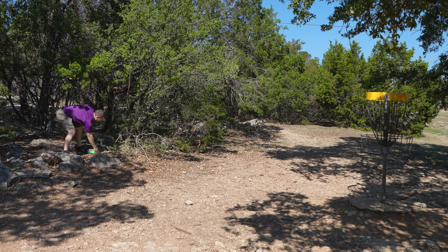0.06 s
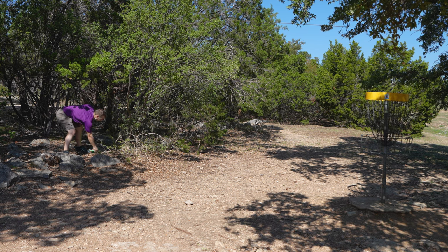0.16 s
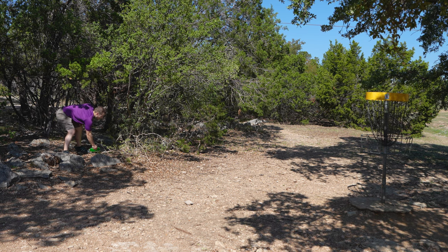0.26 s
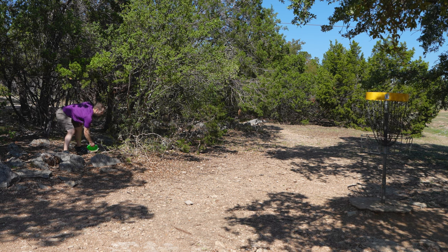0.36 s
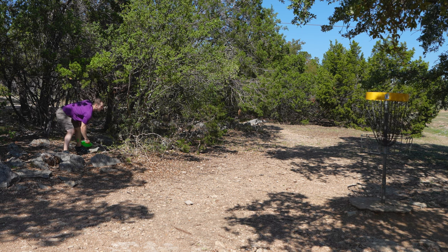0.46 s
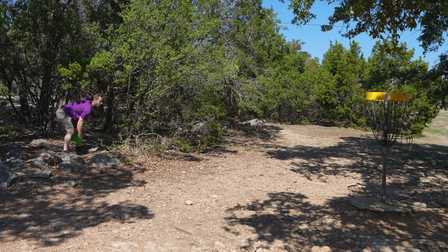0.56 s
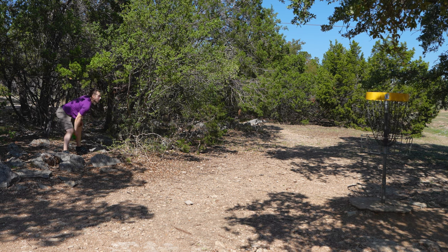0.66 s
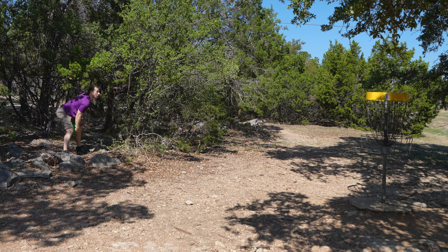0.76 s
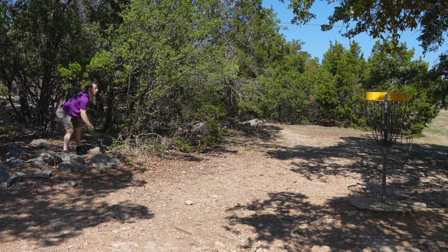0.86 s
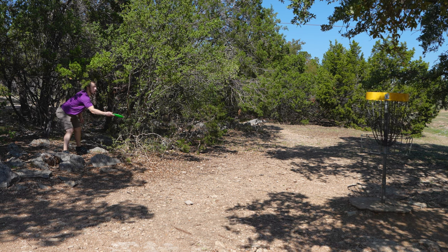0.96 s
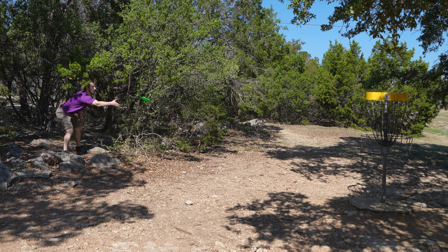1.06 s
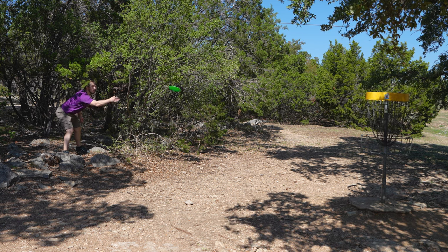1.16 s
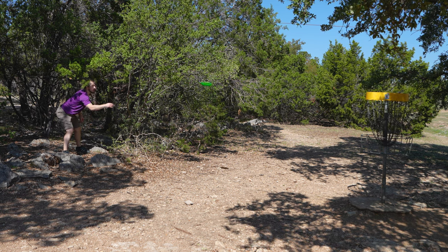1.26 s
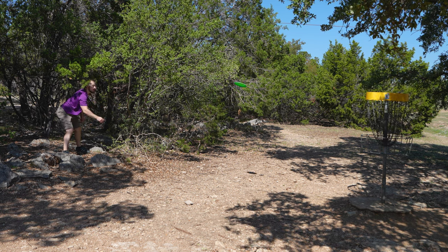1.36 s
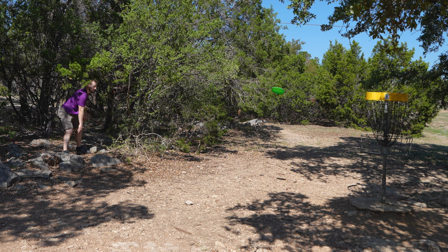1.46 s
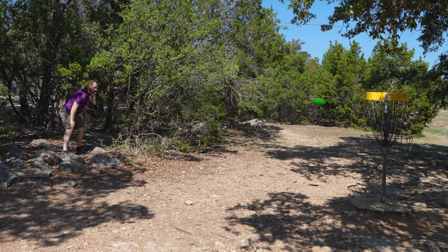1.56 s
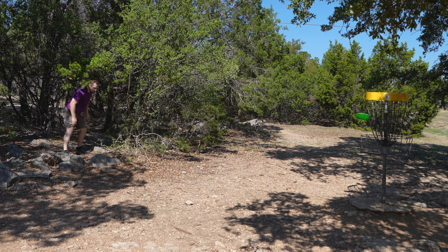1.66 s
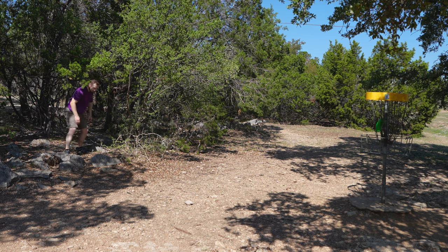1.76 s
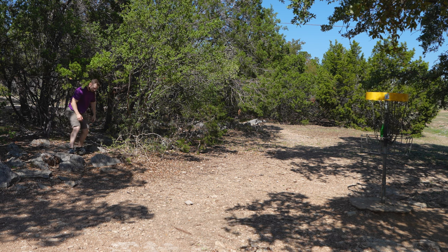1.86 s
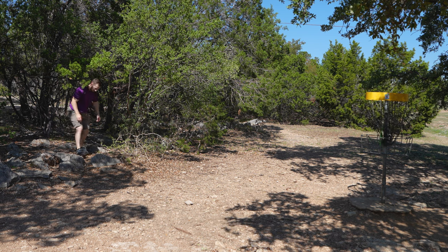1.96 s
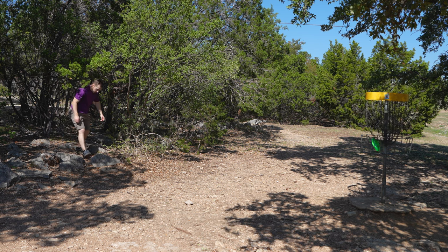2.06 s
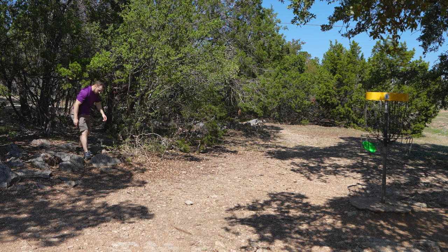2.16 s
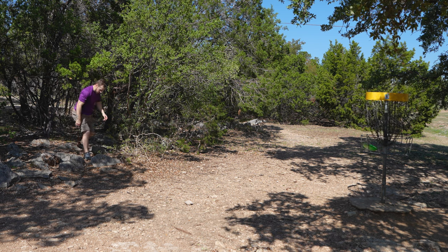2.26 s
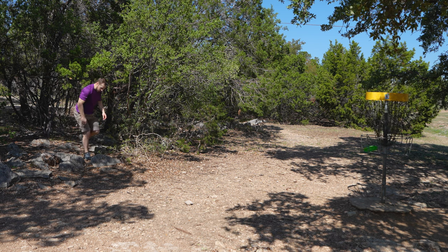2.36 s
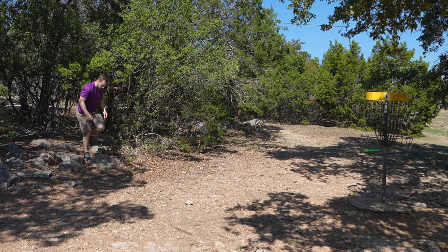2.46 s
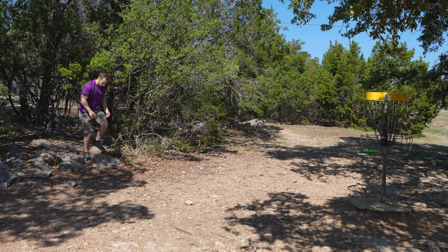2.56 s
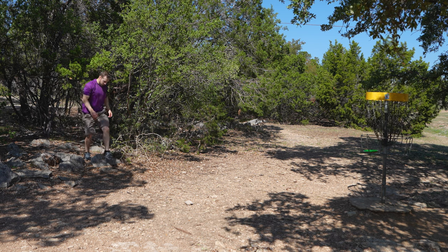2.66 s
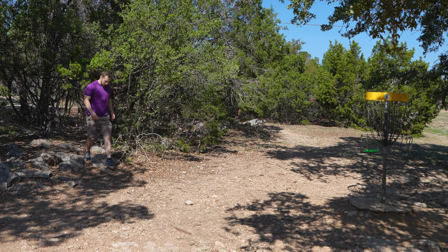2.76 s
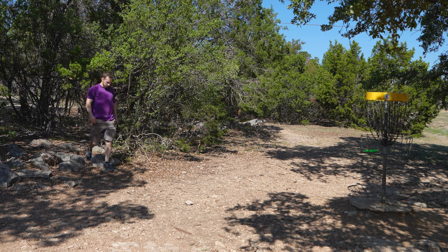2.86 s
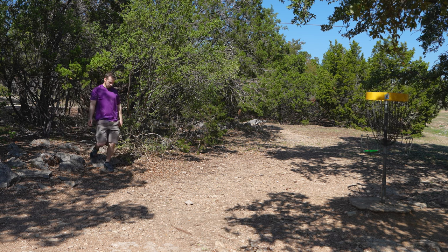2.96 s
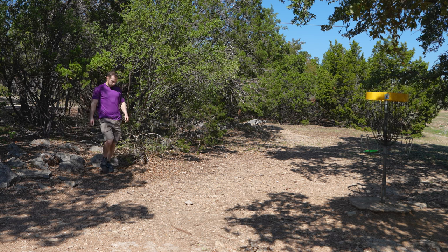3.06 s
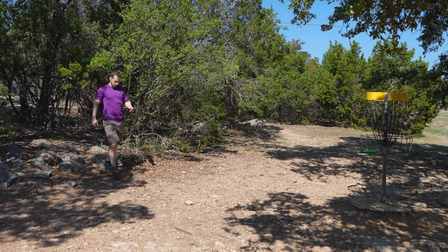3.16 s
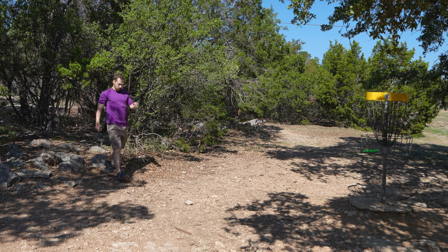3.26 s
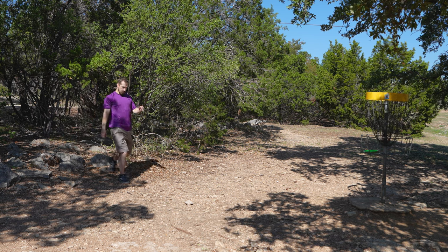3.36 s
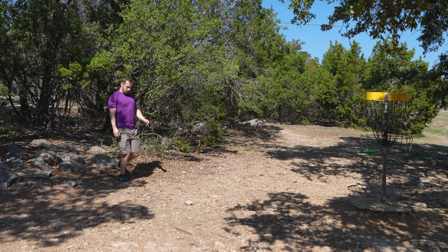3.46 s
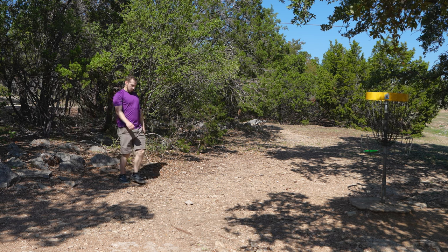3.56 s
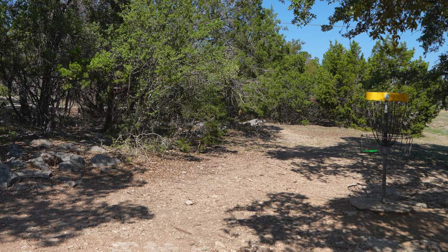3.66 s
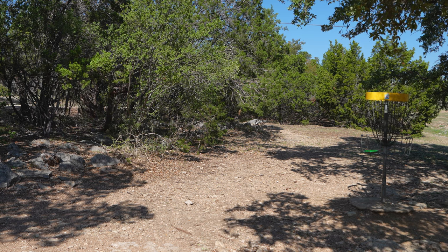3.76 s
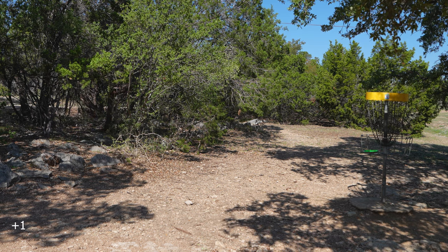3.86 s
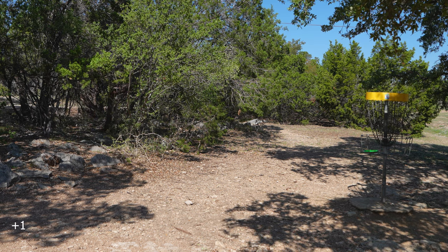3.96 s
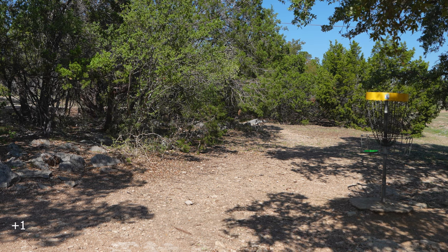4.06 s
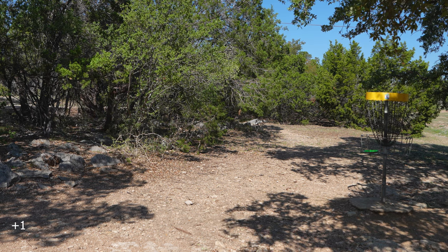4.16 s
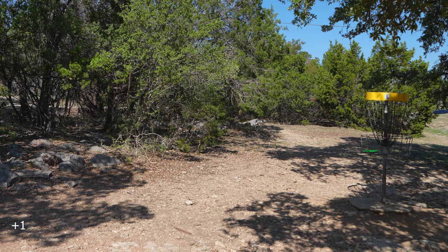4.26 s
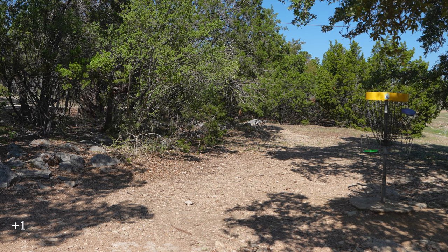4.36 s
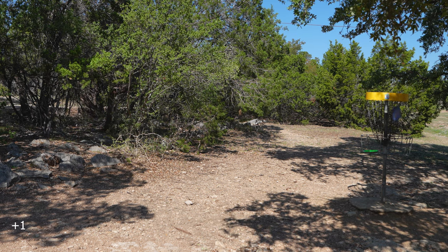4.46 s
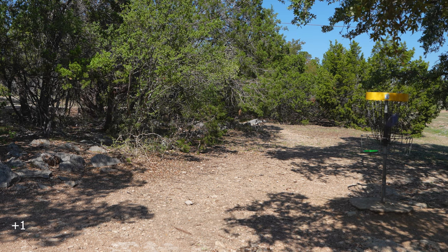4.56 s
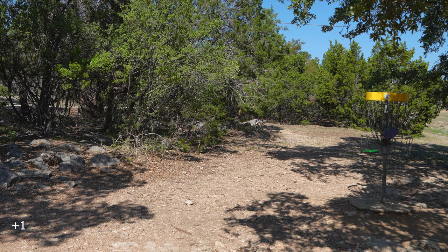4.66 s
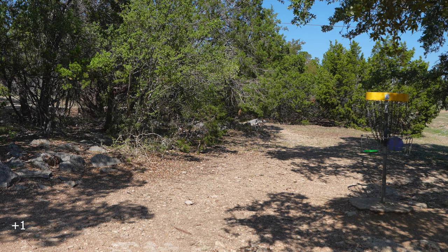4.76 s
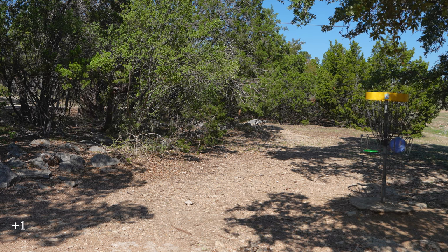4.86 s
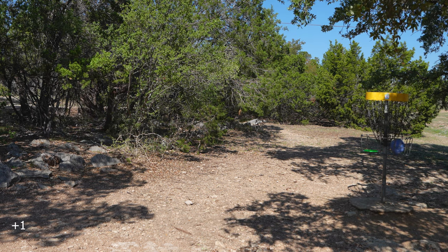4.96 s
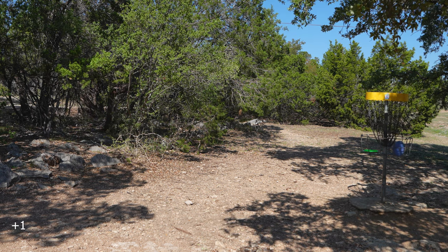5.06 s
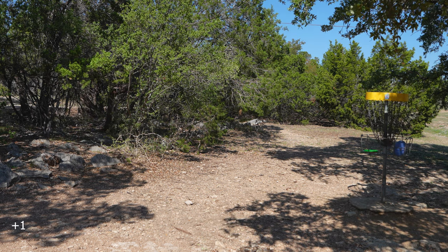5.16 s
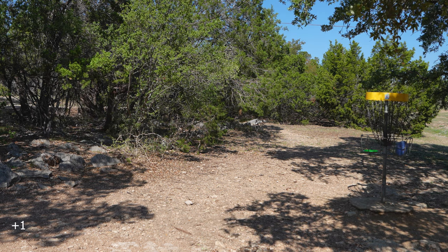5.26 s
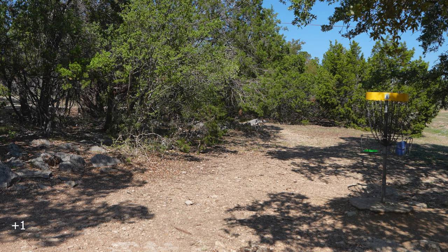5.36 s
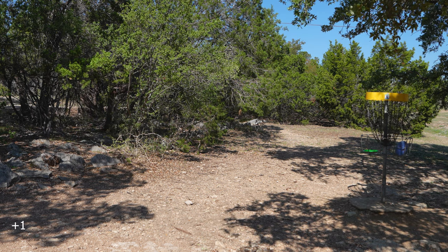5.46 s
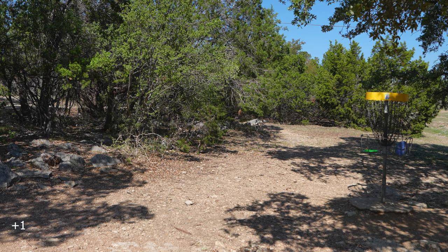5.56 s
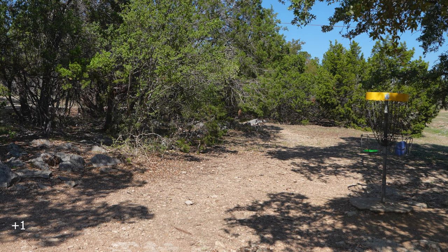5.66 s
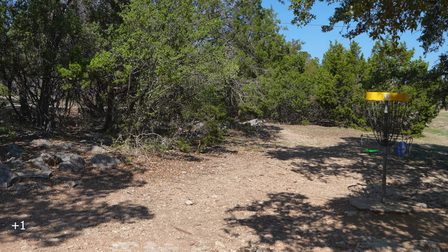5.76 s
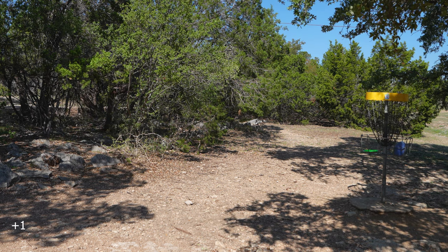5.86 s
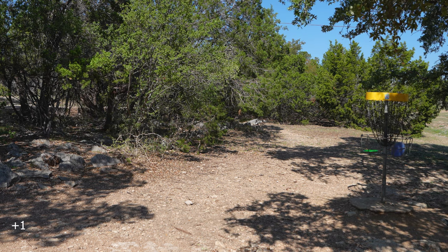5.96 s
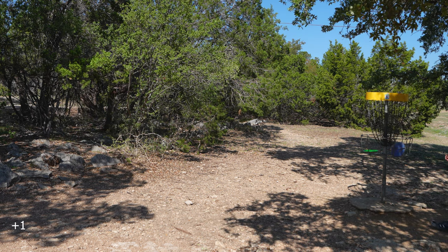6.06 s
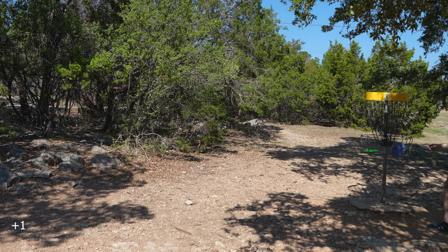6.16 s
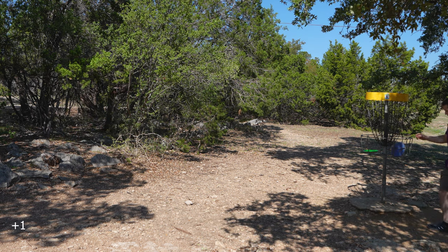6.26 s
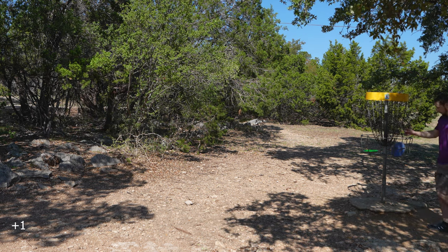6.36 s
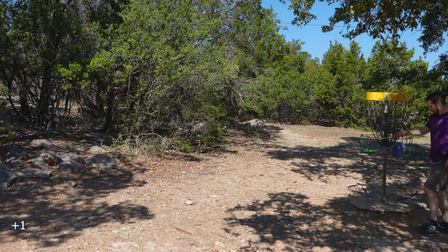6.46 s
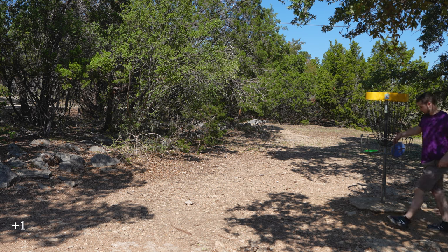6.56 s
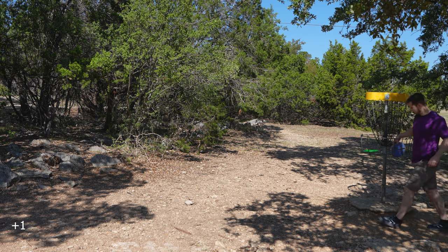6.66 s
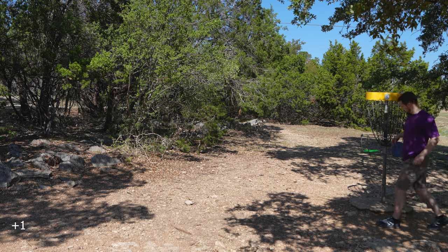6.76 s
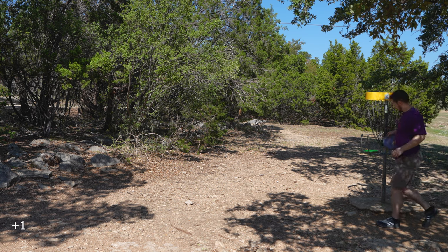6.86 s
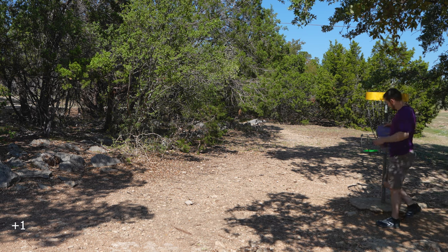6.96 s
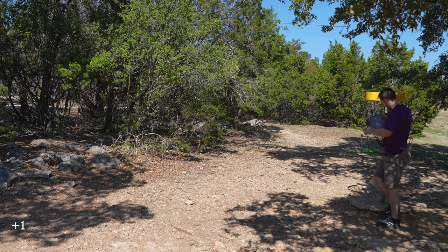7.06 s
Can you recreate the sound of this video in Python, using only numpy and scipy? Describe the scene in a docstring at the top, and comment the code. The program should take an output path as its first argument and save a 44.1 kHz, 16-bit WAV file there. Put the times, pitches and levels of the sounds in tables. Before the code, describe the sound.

Wind thumps the microphone, then a plastic disc crashes into steel chains on the right, jingling and fading; a second disc strikes harder soon after.

```python
"""A clearing among trees: two plastic discs strike the steel chains of a basket to the right, one after the other.
Links and hoop ring as sums of decaying modes, contacts rattle as shaped noise, and noise blows excite the discs.
The thrower's steps on gravel are bursts of tiny cracks; a faint bird and an insect are a gliding tone and a narrow band.
Gusts buffet the microphone as puffs of low noise around the first throw; a steadier low noise lies under the second."""
import sys
import numpy as np
from scipy import signal
from scipy.fft import rfft, irfft, next_fast_len
from scipy.io import wavfile
from scipy.ndimage import uniform_filter1d, map_coordinates

SR = 44100
rng = np.random.default_rng(int(sys.argv[2]) if len(sys.argv) > 2 else 0)


def digitize_waveform(pressure):
    """Quantize a signal to 16-bit integers and store it at the path in sys.argv[1].

    Rows of a 2-D input are taken as channels; values are limited to [-1, 1].
    """
    field = np.atleast_2d(pressure).T
    bounded = np.clip(field, -1, 1)
    quanta = np.round(bounded * 32767).astype(np.int16)
    wavfile.write(sys.argv[1], SR, quanta)


N = 313992

# spectrum of rattling chain contacts: f/Hz, relative density/dB
RATTLE_SPECTRUM = [(500, -36.5), (1200, -3), (2300, -1), (3300, -6), (5000, 1), (8000, 2), (10500, 5.5),
                   (14000, 2), (16000, 3.5)]


def amp(db):
    """Amplitude ratio of a level: 20 dB to a factor of ten."""
    return 10 ** (np.asarray(db) / 20)


def unit(x):
    """Normalisation to an rms of 1."""
    return x / np.sqrt(np.mean(x ** 2) + 1e-20)


def along(points, hz):
    """Interpolation of (f/Hz, value) points on a logarithmic frequency axis."""
    f, v = np.transpose(points)
    return np.interp(np.log(hz + 1), np.log(f + 1), v)


def levels(rows):
    """Level contours: one gain per sample for each dB column, -120 dB outside the rows."""
    s, *columns = np.transpose(rows)
    t = np.arange(N) / SR
    return [amp(np.interp(t, s, column, left=-120, right=-120)) for column in columns]


def wobble(rate):
    """Slow random modulation: a smooth curve through `rate` random knots a second."""
    knots = rng.standard_normal(int(N * rate / SR) + 4)
    return map_coordinates(knots, [np.arange(N) * rate / SR])


def filtered(x, response):
    """Linear filtering: the spectrum of x times a complex response of frequency."""
    size = x.shape[-1]
    m = next_fast_len(size + SR // 4)
    spectrum = rfft(x, m) * response(np.fft.rfftfreq(m, 1 / SR))
    return irfft(spectrum, m)[..., :size]


def coloured(x, spectrum):
    """Spectral shaping of x, at rms 1."""
    return unit(filtered(x, lambda hz: amp(along(spectrum, hz))))


def steady(x, seconds):
    """Level control: divides x by its running rms, keeping the quicker flicker."""
    size = max(int(seconds * SR), 8)
    power = uniform_filter1d(uniform_filter1d(x ** 2, size), size)
    return x / np.sqrt(np.abs(power) + 1e-4 * np.mean(x ** 2))


def add(track, s, sound):
    """Superposition: mixes a sound in at time s."""
    part = track[max(round(s * SR), 0):][:len(sound)]
    part += sound[:len(part)]


def spell(start, end, rise_s, fall_s):
    """Exponential relaxation: an envelope that rises at start, holds, and dies away after end."""
    t = np.arange(N) / SR
    rise = 1 - np.exp(-np.maximum(t - start, 0) / rise_s)
    return rise * np.exp(-np.maximum(t - end, 0) / fall_s)


def contacts(rate, scatter_db):
    """Random impacts: impulses at `rate` a second, of either sign and uneven size."""
    hits = rng.random(N) < rate / SR
    return hits * rng.choice([-1, 1], N) * amp(scatter_db * rng.standard_normal(N))


def grains(rate, t60, scatter_db, spectrum):
    """Granular noise: random impacts, each a decaying burst of coloured noise, held near rms 1."""
    t = np.arange(SR // 10) / SR
    power = signal.fftconvolve(contacts(rate, scatter_db) ** 2, amp(-60 * t / t60) ** 2)[:N]
    noise = np.sqrt(np.abs(power)) * rng.standard_normal(N)
    return steady(coloured(noise, spectrum), 0.23)


def struck(modes, t):
    """Modal synthesis: one blow rings every mode at a new strength and phase."""
    hz, db, t60 = np.transpose(modes)[:, :, None]
    strength, phase = rng.standard_normal((2, len(modes), 1))
    decay = amp(db + 2 * strength - 60 * t / t60)
    return np.sum(decay * np.sin(2 * np.pi * (hz * t + phase)), 0)


def jingle(rate=16, uneven_db=2.1, ring_db=-1.0, chatter_db=-6, click_db=-13, count=30):
    """Repeated impact excitation: swinging links are struck again and again, and the contacts click."""
    # taut, damped links: f/Hz, relative density/dB
    chatter_spectrum = [(3000, -53), (8500, -50), (9500, 25), (10500, -21), (11650, 30), (12100, 13),
                        (12550, 21), (13100, 1), (13550, 12), (14300, 4), (15100, -11), (16000, -16)]
    # sharp link clicks: f/Hz, relative density/dB
    click_spectrum = [(2000, -30), (5000, -14), (8000, -6.5), (10500, -1), (14300, 3), (16000, -1)]
    t = np.arange(SR // 4) / SR
    ring = sum(signal.oaconvolve(contacts(rate, scatter_db=6), link_ring(t))[:N] for _ in range(count))
    chatter = grains(rate=350, t60=.014, scatter_db=5, spectrum=chatter_spectrum)
    clicks = grains(rate=260, t60=.006, scatter_db=5, spectrum=click_spectrum)
    rattle = grains(rate=380, t60=.018, scatter_db=4, spectrum=RATTLE_SPECTRUM) + clinks()
    ring = amp(ring_db) * steady(ring, 0.06) + amp(chatter_db) * chatter + amp(click_db) * clicks
    sing, scrape = swing()
    return (amp(-0.5) * sing * ring + scrape * rattle) * amp(uneven_db * wobble(25))


def link_ring(t, damping_spread=0.31):
    """Modal ringing of one steel link; no two are tuned alike, and their neighbours damp them unevenly."""
    # link modes: f/Hz, relative level/dB, nominal t60/s, spread between links as a share of pitch
    modes = [(3400, -31, .1, .04), (4450, -28, .08, .06), (7300, -23, .07, .11), (9500, -13, .08, .018),
             (11635, 0, .19, .004), (12540, -5.5, .19, .0025), (13545, -11, .17, .003),
             (15070, -9, .12, .008)]
    hz, db, t60, spread = np.transpose(modes)[:, :, None]
    detune, strength, phase = np.clip(rng.standard_normal((3, len(modes), 1)), -2, 2)
    life = t60 * np.exp(damping_spread * np.clip(rng.standard_normal(), -2, 1))
    decay = amp(db + 3.1 * strength - 60 * t / life)
    return np.sum(decay * np.sin(2 * np.pi * (hz * (1 + spread * detune) * t + phase)), 0)


def clinks(scatter_db=4, low_hz=3000, high_hz=11500, count=4000):
    """Glancing contacts between links: brief decaying partials, each at its own pitch."""
    t, t60 = np.arange(SR // 32) / SR, .035
    when, pitch = rng.random((2, count, 1))
    size = amp(scatter_db * rng.standard_normal((count, 1)))
    hz = low_hz + (high_hz - low_hz) * pitch
    pings = size * amp(-60 * t / t60) * np.sin(2 * np.pi * hz * t)
    places = (when * N).astype(int) + np.arange(len(t))
    return steady(np.bincount(places.ravel(), pings.ravel(), N)[:N], .025)


def swing():
    """Energy decay of the chains: a spray on impact, a hold, a fade, and idle swaying."""
    # a disc sets the chains swinging: t/s, link ring level/dB, contact rattle level/dB,
    # time constant of the ring's rise/s, time the disc stays among the links/s, fade/(dB per s)
    throws = [(1.753, -27.5, -43.5, 0.034, 0.45, 29.5), (4.437, -26, -41.5, 0.0048, .36, 42.5)]
    # the chains sway idly: start t/s, end t/s, link ring level/dB, contact rattle level/dB
    sways = [(0.07, 0.277, -58.5, -66), (.42, 0.899, -70, -67.5), (3.36, 3.65, -59.5, -75),
             (5.427, 6.62, -59.5, -67), (6.624, 7.12, -76, -68.5)]
    spray_db, spray_t60 = 14, 0.22  # extra rattle as the disc ploughs in
    settle_s, settle_db_per_s = 1.44, 140  # then the links stop touching
    rattle_sag_db_per_s = 14.5  # contacts soften as the swing goes on
    sway_edge_s = 0.021
    sing, scrape = np.zeros((2, N))
    t = np.arange(2 * SR) / SR
    for s, ring_db, rattle_db, rise, hold, fade in throws:
        settle_db = -settle_db_per_s * np.maximum(t - settle_s, 0)
        fade_db = settle_db - fade * np.maximum(t - hold, 0)
        add(sing, s, amp(ring_db + fade_db) * (1 - np.exp(-t / rise)))
        spray = amp(spray_db - 60 * t / spray_t60)
        # the rattle fades at half the ring's pace in dB, besides its own sag
        add(scrape, s, amp(rattle_db) * (spray + amp(.5 * fade_db - rattle_sag_db_per_s * t)))
    for start, end, ring_db, rattle_db in sways:
        sway = spell(start, end, sway_edge_s, sway_edge_s)
        sing, scrape = sing + amp(ring_db) * sway, scrape + amp(rattle_db) * sway
    return sing, scrape


def clashes(spread_s=0.012, rattle_t60=0.2, crack_t60=0.027, ring_db=-12, burst_db=2.0, crack_db=9, count=6):
    """Impact of chain on chain: a noise crack, then a few links set ringing in quick succession."""
    # chains slap together: t/s, relative link level/dB, relative rattle level/dB
    slaps = [(0.1396, -38, -51), (0.4273, -42.5, -55), (0.5027, -40, -52.5), (0.829, -48, -72),
             (1.8211, -20, -34), (1.9227, -17, -59), (1.9841, -13, -34.5), (2.1236, -24, -38),
             (2.1931, -13, -35.5), (2.2272, -9.5, -39), (2.3198, -15.5, -44), (2.3531, -10.5, -38),
             (2.4513, -30, -43.5), (2.613, -20.5, -42.5), (2.6685, -19, -45), (2.7045, -23, -45),
             (2.7658, -18, -45), (2.8553, -25.5, -38), (2.877, -30, -55), (2.912, -22.5, -42),
             (3.0108, -29.5, -46), (3.0754, -27.5, -59), (3.3665, -32, -72), (3.4005, -22.5, -70),
             (3.6094, -36.5, -47.5), (4.489, -15, -39), (4.5192, -18, -60), (4.6063, -15, -33),
             (4.6865, -25, -35), (4.7624, -14, -44), (4.8448, -18, -36.5), (4.955, -24, -38.5),
             (5.0446, -43, -41), (5.149, -28, -42), (5.2278, -28.5, -76), (5.3091, -26.5, -75.5),
             (5.4994, -45, -45.5), (5.5967, -23, -53), (5.7175, -28, -69), (5.7584, -22, -44.5),
             (6.0496, -41, -52), (6.1015, -43, -56), (6.223, -36.5, -60), (6.2857, -35.5, -51.5),
             (6.3412, -24.5, -53), (6.525, -39, -50)]
    t = np.arange(SR // 3) / SR
    ring, burst, crack = np.zeros((3, N))
    for s, link_db, rattle_db in slaps:
        slap = np.zeros(len(t))
        for k in range(count):
            delay = spread_s * (k + rng.random()) / count * (k > 0)  # the first link rings at once
            add(slap, delay, amp(-1.2 * k) * link_ring(t))
        add(ring, s, amp(link_db + ring_db) * slap / np.std(slap[:SR // 32]))
        add(burst, s, amp(rattle_db + burst_db - 60 * t / rattle_t60))
        add(crack, s, amp(rattle_db + crack_db - 60 * t / crack_t60))
    rattle = grains(rate=600, t60=.007, scatter_db=3, spectrum=RATTLE_SPECTRUM)
    return ring + burst * rattle + crack * coloured(rng.standard_normal(N), RATTLE_SPECTRUM)


def hoop(chatter_t60=0.1, ring_db=-1.5, chatter_db=-4, spread_hz=150, choke_s=.012):
    """Modal ringing of the hoop that gathers the chains: each blow chokes the last; links chatter on it."""
    # hoop modes: f/Hz, relative level/dB, t60/s
    modes = [(4141, 1, 0.5), (4120, -1, 0.4), (4340, -1, 0.052), (4650, -11.5, 0.29), (4980, -15, 0.12),
             (7600, -14, 0.18)]
    # blows on the hoop: t/s, relative level/dB
    blows = [(1.822, -38), (1.845, -31.5), (1.889, -29.5), (1.985, -37), (2.08, -40.5), (2.192, -26.5),
             (2.228, -28), (2.319, -35.5), (2.615, -41), (2.668, -32.5), (2.706, -34.5), (2.89, -45.5),
             (3.018, -49.5), (4.47, -38), (4.521, -38.5), (4.606, -24.5), (4.645, -27), (4.688, -27.5),
             (4.763, -30.5), (4.847, -33.5), (5.042, -29), (5.147, -41.5)]
    t, out, shaking = np.arange(SR * 2 // 3) / SR, np.zeros(N), np.zeros(N)
    gaps = np.diff([s for s, _ in blows], append=N / SR)
    for (s, db), gap in zip(blows, gaps):
        free = (1 - np.exp(-t / 0.0017)) * np.exp(-np.maximum(t - gap, 0) / choke_s)
        add(out, s, amp(db + ring_db) * struck(modes, t) * free)
        add(shaking, s, amp(db + chatter_db - 60 * t / chatter_t60) * free)
    main_hz = modes[0][0]

    def resonance(f):
        loss = 1j * f * spread_hz
        return loss / (main_hz ** 2 - f * f + loss)

    taps = filtered(contacts(400, scatter_db=4), resonance)
    tremble = amp(2.5 * wobble(90))
    return out * tremble + shaking * steady(taps, 0.03)


def tray():
    """Modal ringing of the tray's wires: light pings."""
    # a chain taps a wire of the tray: t/s, relative level/dB
    taps = [(0.504, -68), (0.82, -55.5), (2.779, -58), (2.853, -49), (3.111, -58), (5.497, -46),
            (6.524, -60)]
    # wire modes: f/Hz, relative level/dB, t60/s
    modes = [(3140, -5.5, 0.023), (3320, -3, 0.06), (5950, -8, 0.091), (6600, -8, 0.29), (6400, -14, 0.15),
             (9310, 2, 0.15)]
    t, out = np.arange(SR // 3) / SR, np.zeros(N)
    for s, db in taps:
        add(out, s, amp(db) * struck(modes, t))
    return out


def knocks(chatter_t60=0.12, blow_t60=0.0033, blow_db=7, split_hz=1500):
    """Forced resonance, plastic on steel: a sharp blow and a brief chatter drive the disc and the basket."""
    # a disc strikes chains, pole or tray: t/s, relative thud level/dB, relative clack level/dB
    strikes = [(1.75, -25.5, -37), (1.773, -28, -37.5), (2.118, -36.5, -43.5), (2.306, -37, -47),
               (4.436, -25, -24), (4.463, -25.5, -55), (4.548, -35, -59), (4.736, -29.5, -37),
               (4.837, -35, -57), (4.878, -24, -36.5), (4.968, -29.5, -40), (5.091, -28.5, -47),
               (5.329, -33.5, -59)]
    # resonances of disc and basket: f/Hz, width/Hz, relative level/dB
    resonances = [(321, 71, -7), (429, 17, 2.5), (592, 120, -1), (900, 720, -5), (1336, 235, 3),
                  (2040, 370, 0.5), (2120, 160, 2.5), (2400, 86, -1), (2920, 270, -3.5), (3600, 490, -14.5)]
    t, push = np.arange(SR // 4) / SR, np.zeros((2, N))
    shape = amp(-60 * t / chatter_t60) + amp(blow_db - 60 * t / blow_t60)
    for s, thud_db, clack_db in strikes:
        add(push[0], s, amp(thud_db - 10.5) * shape)
        add(push[1], s, amp(clack_db - 2.5) * shape)

    def body(f):
        modes = 0
        for k, (centre, width, db) in enumerate(resonances):
            loss = 1j * f * width
            modes = modes + (-1) ** k * amp(db) * loss / (centre * centre - f * f + loss)
        low = 1 / (1 + (f / split_hz) ** 4)
        halves = modes * np.array([low, 1 - low])  # thud below, clack above
        return halves / np.sqrt(np.mean(np.abs(halves) ** 2, 1, keepdims=True))

    return filtered(push * rng.standard_normal((2, N)), body).sum(0)


def steps(t60=0.11):
    """Granular friction: each footfall crunches a few stones."""
    # shoes on gravel: t/s, relative level/dB
    footfalls = [(3.398, -41), (3.628, -35), (6.06, -43), (6.216, -31.5), (6.339, -37), (6.685, -39),
                 (6.73, -28.5), (6.782, -31), (6.833, -34.5), (6.908, -34), (7.077, -47)]
    # crunch of stones: f/Hz, relative density/dB
    gravel_spectrum = [(200, -25), (700, -2.5), (1400, 8), (2400, -1), (4500, -13.5), (15000, -20)]
    t, press = np.arange(SR // 4) / SR, np.zeros(N)
    for s, db in footfalls:
        add(press, s, amp(db - 6.5 - 60 * t / t60) * (1 - np.exp(-t / 0.00056)))
    return press * grains(rate=490, t60=0.0048, scatter_db=5, spectrum=gravel_spectrum)


def from_right(x):
    """Interaural differences: sound from the basket's side reaches the left port later and weaker."""
    # level difference: f/Hz, left minus right/dB
    side = [(300, 0), (700, -3), (2000, -8), (4100, -11), (7000, -8), (12000, -9.5)]
    # phase difference: f/Hz, lag of the left/rad
    lag = [(500, 0), (2000, 1.3), (4100, 2.4), (7000, 3.1), (12000, 4.2), (15000, 5.1)]

    def ports(hz):
        left = amp(along(side, hz)) * np.exp(-1j * along(lag, hz))
        return np.array([left, np.ones_like(left)]) * 2 / np.abs(1 + left)

    return filtered(x, ports)


def trees(x, size=8192):
    """Diffuse scattering by ground and trees: a short noise tail, different in each ear and in each block."""
    # decay of the tail: f/Hz, t60/s
    decay = [(300, 0.073), (3000, 0.47), (12000, 0.2)]
    out, fade = np.zeros((2, N)), signal.get_window("hann", size)
    for start in range(0, N, size // 2):
        hz, t, z = signal.stft(rng.standard_normal((2, SR // 4)), SR, nperseg=256)
        fading = amp(-60 * t / along(decay, hz)[:, None])
        tail = signal.istft(z * fading, SR, nperseg=256)[1]
        piece = x[start:start + size]
        piece = piece * fade[:len(piece)]
        for ear, echo in zip(out, tail):
            add(ear, start / SR, signal.fftconvolve(piece, echo / np.linalg.norm(echo)))
    return out


def bird(length=0.083, top_hz=4160, rise=0.055, second_voice=.895, quaver=0.013, count=6):
    """Frequency modulation: an arched, quavering note over a weaker second voice; the phrase swells and ebbs."""
    start_s, gap_s = 5.672, .1212
    peak_s, peak_db, fall_db_per_s = 6.12, -53.5, 13  # loudest moment, fall to either side
    u, out = np.linspace(0, 1, int(length * SR)), np.zeros(N)
    shake = 1 + quaver * wobble(260)
    for s in start_s + gap_s * np.arange(count):
        arch = 1 - rise * (1 - np.sin(2.0 * u))
        pitch = top_hz * arch * shake[round(s * SR):][:len(u)]
        phase = 2 * np.pi * np.cumsum(pitch) / SR
        voices = np.sin(phase) + amp(-4.0) * np.sin(second_voice * phase)
        add(out, s, amp(peak_db - fall_db_per_s * abs(s - peak_s)) * np.sin(np.pi * u) * voices)
    return out


def insect(width_hz=240, edge_s=0.02):
    """Narrow-band noise: the thin, fuzzy trill of a distant insect."""
    # trills: start t/s, end t/s, centre f/Hz, level/dB
    trills = [(1.153, 3.6, 5420, -83), (3.647, 4.4, 5250, -71), (6.837, 7.01, 5200, -58.5)]
    out = np.zeros((2, N))
    for start, end, centre_hz, db in trills:
        noise = rng.standard_normal((2, N))
        buzz = filtered(noise, lambda hz: np.exp(-((hz - centre_hz) / width_hz) ** 2))
        out += amp(db) * spell(start, end, edge_s, edge_s) * unit(buzz)
    return out


def wind(rumble_lag=1.0, flutter_lag=1.67):
    """Turbulent pressure: eddies sweep across the two ports, reaching the right one first; lags in rad."""
    # spectra of the slow and the quick eddies: f/Hz, relative density/dB
    rumble_spectrum = [(20, 3.5), (50, 0.5), (125, 3), (200, -4.5), (350, -15.5), (800, -38.5), (2000, -82)]
    flutter_spectrum = [(60, -40), (170, 0.5), (260, 6), (420, -4.5), (680, -5.5), (1000, -13.5),
                        (1500, -26), (2500, -53.5), (8000, -64)]
    rumble, flutter = gusts()

    def eddies(spectrum, lag, own_db):
        lumps = amp(4 * wobble(110))  # turbulence comes in quick puffs
        shared = steady(coloured(lumps * rng.standard_normal(N), spectrum), 0.11)
        ports = np.array([[-1], [1]])
        pair = filtered(shared, lambda hz: np.exp(.5j * lag * ports * np.tanh(hz / 150)))
        return pair + amp(own_db) * coloured(rng.standard_normal((2, N)), spectrum)

    gusty = flutter ** 2 / (flutter ** 2 + amp(-46.5) ** 2)  # weak gusts flutter less
    low = amp(0.5) * rumble * eddies(rumble_spectrum, rumble_lag, -8)
    return low + amp(6.0) * flutter * gusty * eddies(flutter_spectrum, flutter_lag, -10)


def gusts():
    """Power addition of gusts: rumble and flutter rise, hold and drop back to the lull."""
    # gusts on the microphone: start t/s, length/s, relative rumble level/dB, relative flutter level/dB
    rows = [(0.0, 0.4, -32, -49.5), (0.123, 0.091, -26, -34), (0.263, 0.041, -26, -29),
            (0.835, 0.15, -39, -41), (0.989, 0.12, -51, -37), (1.004, 0.548, -43, -40),
            (1.697, 0.13, -41.5, -48), (2.065, 0.069, -41.5, -47.5), (2.22, 0.034, -42, -47),
            (2.299, 0.032, -47, -44), (2.474, 0.075, -44, -52), (2.661, 0.06, -42.5, -51.5),
            (3.203, 0.11, -41.5, -52.5), (3.374, .1, -43, -51.5)]
    rise_s, fall_s = 0.01, 0.047
    lull_db, lull_end_s = -52.5, 3.65  # rumble between gusts; when it dies away
    rumble, flutter = amp(lull_db) * spell(0, lull_end_s, rise_s, fall_s), np.zeros(N)
    for s, length, rumble_db, flutter_db in rows:
        shape = spell(s, s + length, rise_s, fall_s)
        rumble = np.hypot(rumble, amp(rumble_db) * shape)
        flutter = np.hypot(flutter, amp(flutter_db) * shape)
    return rumble, flutter


def pops(width=0.0051):
    """Transient pressure: a sharp eddy pushes the diaphragm and lets it swing back; width in s."""
    # single eddies on the microphone: t/s, relative level/dB
    puffs = [(.187, -29), (.262, -25), (.285, -25), (.319, -14.5), (.987, -21), (1.036, -39), (1.071, -32),
             (1.529, -48), (3.465, -33)]
    u, out = np.arange(SR // 40) / SR / width, np.zeros(N)
    for s, db in puffs:
        add(out, s, amp(db) * (1 - u) * np.exp(-u))
    return filtered(out, lambda hz: 1 / (1 + 1j * hz / 2200) ** 2)


def air():
    """Broadband noise: a murmur of leaves, a treble hiss, and a low breeze heard throughout the second throw."""
    # levels of murmur, hiss and breeze, which rise and dip as heard: t/s, relative level/dB
    murmur_level = [(0, -48.5), (.6, -56.5), (1.65, -62.5), (2.3, -54), (3.2, -58.5), (3.8, -55.5),
                    (4.4, -54), (4.65, -63), (5.05, -49.5), (5.45, -57), (6.3, -54), (7.12, -51)]
    hiss_level = [(0, -63), (.85, -71.5), (1.0, -86), (1.72, -80), (1.9, -60.5), (3.25, -67.5), (3.6, -66),
                  (3.7, -61), (7.12, -61)]
    breeze_level = [(3.66, -53), (4.48, -54.5), (4.54, -63.5), (4.84, -64), (4.88, -55), (4.93, -59),
                    (7.09, -50.5), (7.12, -52)]
    # their spectra: f/Hz, relative density/dB
    murmur_spectrum = [(100, -38), (400, -8), (750, 4), (1300, 3.5), (2000, -2.5), (3500, -23.5),
                       (8000, -35)]
    hiss_spectrum = [(1000, 8.5), (3000, 8.5), (5300, 2.5), (7000, 3), (10000, 4.5), (15500, -4)]
    breeze_spectrum = [(20, -3), (80, 3.5), (150, -1), (330, -0.5), (550, -3.5), (900, -10.5),
                       (2000, -42.5)]
    (murmur,), (hiss,), (breeze,) = map(levels, (murmur_level, hiss_level, breeze_level))
    leaves = murmur * amp(1.55 * wobble(9.9)) * rush(murmur_spectrum, side_db=4.0)
    fizz = hiss * amp(7.0 + 1.7 * wobble(12)) * rush(hiss_spectrum, side_db=-3.5)
    return leaves + fizz + amp(4.0) * breeze * rush(breeze_spectrum)


def rush(spectrum, side_db=0):
    """Partial coherence: stereo noise, nearly mono in the bass; side_db is left minus right."""
    # coherence of the air: f/Hz, left-right likeness
    alike = [(100, 1), (500, 0.91), (1500, 0.29), (4000, 0)]

    def mid_side(hz):
        turn = np.arccos(np.clip(along(alike, hz), -1, 1)) / 2
        return amp(along(spectrum, hz)) * np.array([np.cos(turn), np.sin(turn)])

    mid, side = filtered(rng.standard_normal((2, N)), mid_side)
    return unit(np.array([mid + side, mid - side])) * amp([[side_db / 2], [-side_db / 2]])


def scene():
    """Superposition: basket and footsteps on the right, bird in the middle, insect, wind and air across both."""
    clatter = jingle() + clashes() + tray() + knocks() + steps()
    ring, song = hoop(), bird()
    echo = trees(clatter + amp(-3) * ring + song) * amp([[-5], [-2]])
    basket = amp(-2) * from_right(clatter + ring)
    return basket + echo + song + insect() + wind() + pops() + air()


def record(dry):
    """Band limiting: the deepest bass falls away below 36 Hz, and a very steep edge ends the treble."""
    top_hz = 15780

    def band(hz):
        high_pass = hz ** 2 / np.sqrt(hz ** 4 + 36 ** 4)
        return high_pass / (1 + (hz / top_hz) ** 400)

    return filtered(dry, band)


dry = scene()
out = record(dry)
digitize_waveform(out)
```